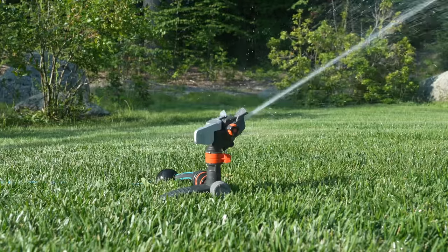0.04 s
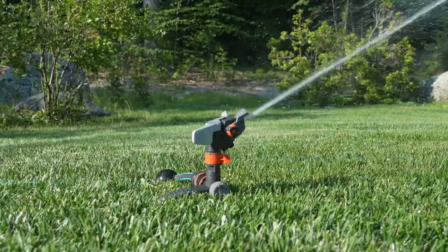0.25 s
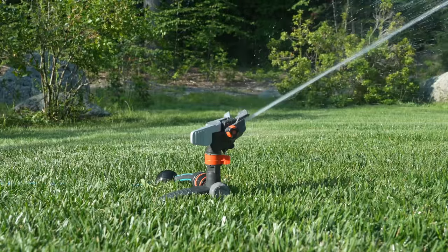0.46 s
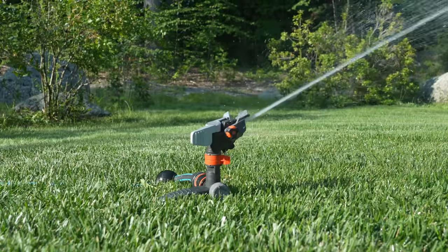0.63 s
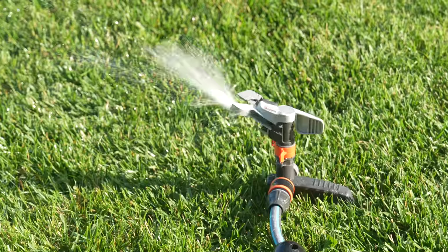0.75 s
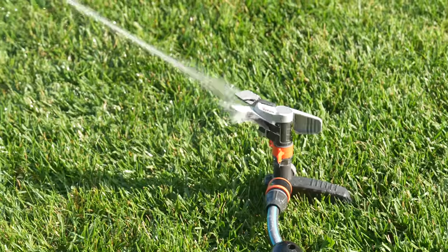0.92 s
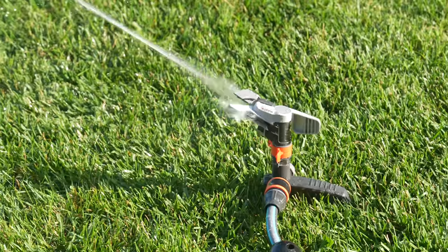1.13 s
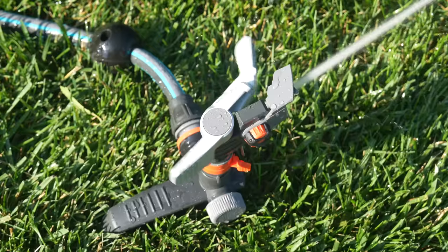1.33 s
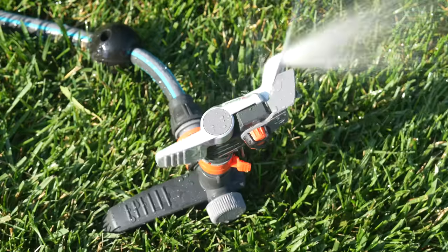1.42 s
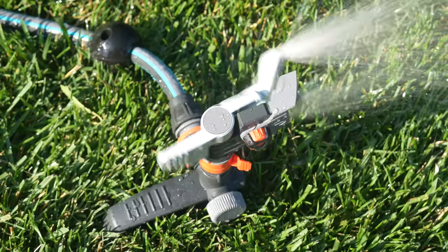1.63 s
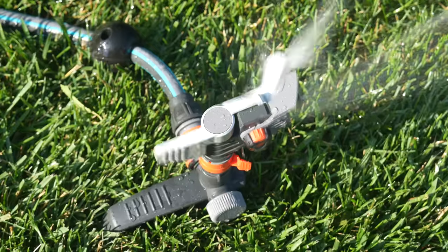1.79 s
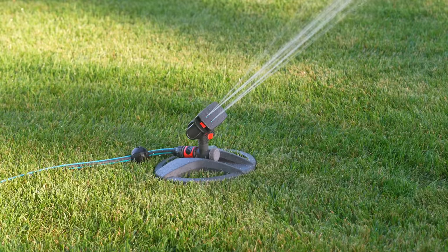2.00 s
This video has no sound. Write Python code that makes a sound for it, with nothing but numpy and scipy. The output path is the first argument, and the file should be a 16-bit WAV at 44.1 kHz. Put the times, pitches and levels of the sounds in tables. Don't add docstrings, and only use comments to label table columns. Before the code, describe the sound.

Outdoors on a lawn, a sprinkler arm chops its hissing water jet in crisp, even splashes with plastic knocks, softer at first and louder from a nearer spot, then only hiss, with low road rumble and faint bird chirps.

```python
import sys
import numpy as np
from scipy import signal
from scipy.fft import rfft, irfft, next_fast_len
from scipy.io import wavfile
from scipy.ndimage import uniform_filter1d, map_coordinates

SR = 44100
rng = np.random.default_rng(int(sys.argv[2]) if len(sys.argv) > 2 else 0)


def how_loud(loudness_db):
    steps = np.asarray(loudness_db, float) / 20
    return 10 ** steps


def output_pcm(signal):
    pcm = np.clip(np.atleast_2d(signal).T, -1, 1) * 32767
    wavfile.write(sys.argv[1], SR, np.round(pcm).astype(np.int16))


N = 90537
TOP_HZ = 15790

SPOT_EDGES_S = [0.0354, 0.703, 1.328, 1.997, 2.2]

# (frequency [Hz], density [dB per Hz])
JET_COLOUR = [
    [(820, -55), (1400, -10), (2370, -8.5), (2650, -5.5), (2930, -11), (5950, -4), (6450, -6),
     (9000, -12.5), (15700, -9.5)],
    [(820, -43), (1400, -6.5), (3890, -9), (4390, -4.5), (5540, -7.5), (6190, 0), (6710, -10.5),
     (12400, -9.5), (15700, -9.5)],
    [(820, -43), (1400, -10), (2320, -4.5), (3340, -4.5), (3620, -9.5), (5480, -3.5), (6250, -10),
     (12800, -7.5), (15700, -4.5)],
    [(820, -40), (1400, -7), (2140, 0), (2520, -5.5), (4810, 0.5), (12700, -7.5), (15700, -9.5)],
]
JET_DB = [-48, -51, -46.5, -41.5]
# (frequency [Hz], width [Hz], boost over hiss [dB])
NOZZLE_BANDS = [
    [(6430, 230, 7), (12600, 600, 1)],
    [(6000, 270, -2), (13000, 450, 6)],
    [(2280, 120, 2), (5270, 270, -1)],
    [(5000, 800, 0.5), (2270, 200, -2)],
]
JET_SWAY_DB = 0.7

# (frequency [Hz], density [dB per Hz])
TRAFFIC_COLOUR = [(12, -54), (28, -21.5), (113, 0), (151, -5), (206, -4), (295, -9.5), (566, -10.5),
                  (1160, -17), (1500, -23.5), (1950, -42.5), (3300, -120)]
TRAFFIC_DB = [-49.5, -48.5, -49.5, -44.5]
TRAFFIC_TILT_DB = [-3, 1, 0, 0.5]
# (frequency [Hz], width [Hz], boost [dB])
ENGINE_DRONES = [
    [(117, 28, -2.5), (270, 88, -4.5)],
    [(209.5, 5, 8.5), (246, 8.4, 8)],
    [(169, 12, 0.5), (201, 8.9, 0)],
    [(70.4, 12, 16.5), (199, 21, -2)],
]
HUM_DB = [-52.5, -55, -52.5, -58]
HUM_HZ, HUM_SWAY_DB = 115.5, 3.8

# (start [s], spot [index], splash [dB], stay in jet [s], main spoon ring [Hz])
ARM_SWINGS = [
    (0.143, 0, -29, 0.068, 4570),
    (0.337, 0, -29, 0.069, 4650),
    (.531, 0, -27.5, 0.066, 4630),
    (0.76, 1, -27.5, 0.064, 4470),
    (0.961, 1, -27, 0.062, 4310),
    (1.158, 1, -28, 0.064, 4410),
    (1.411, 2, -26, 0.057, 4050),
    (1.623, 2, -24, 0.056, 4570),
    (1.830, 2, -24.5, 0.056, 5120),
]
# (graze [dB], graze length [s], spoon ring fade [dB], spray swell [dB], leave [dB],
# leave length [s], tail [dB], extra at graze start [dB])
SWING_STAGES = [
    (-6.5, .013, -5, .5, -5, .011, -20, -5),
    (-8, .011, -9, -1.5, -4, .008, -19, -4),
    (-6, .011, -8, .8, -6, .007, -17, -4),
]
# (entry [dB], settling [s], middle [dB], exit surge [dB], surge length [s],
# mist [dB], mist t60 [s])
SPRAY_ARC = [
    (-6.5, .012, 1.5, 2, 0.029, -15, 0.12),
    (2.5, 0.012, -3, 2, 0.0085, -14.5, 0.17),
    (-2, 0.018, -1, 1.5, 0.0078, -12, 0.14),
]
# (frequency [Hz], density [dB per Hz])
SPRAY_COLOUR = [
    [(650, -68), (1100, -48), (2320, -3.5), (3500, -7.5), (4470, -11), (5900, -17.5), (7130, -4.5),
     (7970, -10), (15700, -4.5)],
    [(650, -59), (1100, -35), (1470, -11), (1900, -33), (2070, -11), (3580, -7), (4470, -3), (8520, -9.5),
     (15700, -3.5)],
    [(650, -34), (1100, -4.5), (1660, -12.5), (2220, 0), (2770, -20.5), (4180, 0), (5640, -5.5),
     (6740, -2.5), (15700, -2)],
]
# (frequency [Hz], width [Hz], level [dB])
SPOON_MODES = [
    [(4080, 93, 2.5), (4460, 59, 8), (5190, 140, 2), (6420, 180, -6.5), (6870, 280, -7), (7000, 140, -3.5),
     (9250, 760, -6.5), (12200, 480, -24)],
    [(4220, 160, 5), (4570, 400, -3), (5220, 180, 1.5), (5780, 160, 2), (6340, 200, 0), (9360, 370, -7),
     (10700, 520, -7)],
    [(4110, 50, -7), (4570, 89, -3), (5135, 170, 0), (6440, 270, -4.5), (6860, 34, 5.5), (7840, 90, -2),
     (11100, 180, -11)],
]
# (frequency [Hz], width [Hz], level [dB])
BODY_MODES = [
    [(1820, 220, -10.5), (2280, 160, -4.5), (2790, 250, -1)],
    [(1476, 125, -4.5), (2100, 190, -7), (2880, 570, -5)],
    [(1790, 760, -15.5), (2296, 145, -2.5), (3260, 240, 4)],
]
# (level at flooding [dB], level at exit [dB])
BODY_DB = [
    (-16.5, -9.5),
    (-20, -14),
    (-16.5, -10),
]
EDGE_S, TAIL_T60_S, LEAVE_FALL_DB = 0.0014, 0.057, 6
GRAZE_SPRAY_DB, GRAZE_SPOON_DB, GRAZE_BODY_DB = -4, 1, -16
SPOON_DB, FLUTTER_DB, FLUTTER_HZ = -3, 2.1, 200
GRAIN_DB, GRAINS_PER_S, GRAIN_SPREAD_DB = -6, 1600, 3.5
SING_WIDTH_HZ, SING_DB, SING_FADE_DB = 180, -8, -10

# (time [s], pitch [Hz], peak [dB])
AIR_POCKETS = [(0.1631, 4600, -28.5), (0.1761, 4700, -39), (0.181, 4730, -31.8), (0.2, 7250, -25.5),
               (0.206, 2906, -30.1), (0.3706, 4260, -28.5), (0.379, 4660, -33), (0.3856, 11700, -35),
               (0.3926, 4040, -30), (0.3936, 10000, -31), (0.5537, 11676, -28), (0.5645, 4640, -27),
               (0.577, 4500, -34), (0.5796, 6770, -32), (0.5892, 2330, -27), (0.7762, 6390, -28.5),
               (0.7787, 11125, -33.6), (0.7798, 4510, -33), (0.7882, 4310, -33), (0.7885, 5480, -30),
               (0.9752, 6200, -32), (0.9747, 4470, -30), (0.9896, 4670, -25.5), (1.0015, 4640, -26),
               (1.016, 11175, -33), (1.1763, 4610, -28), (1.176, 5650, -26), (1.1838, 4040, -27.5),
               (1.189, 5140, -28), (1.2144, 4170, -40), (1.4266, 5220, -25), (1.4327, 5110, -21),
               (1.4414, 4159, -19), (1.4587, 6970, -28), (1.4632, 3960, -28), (1.6343, 5010, -30),
               (1.6388, 6090, -23), (1.6463, 4350, -21.5), (1.6573, 6800, -25), (1.6656, 4140, -22.5),
               (1.8423, 6400, -34), (1.8428, 5130, -25), (1.8503, 5240, -33), (1.8583, 5230, -37),
               (1.8817, 5011, -27.0)]
POCKET_S, POCKET_DB, POCKET_GLIDE_HZ = 0.009, 1, 120

# (time [s], peak [dB])
ARM_STRIKES = [
    (0.162, -26.5),
    (0.3559, -22),
    (0.5482, -22),
    (0.778, -28),
    (0.9794, -24),
    (1.178, -25.5),
    (1.4261, -27),
    (1.6374, -26),
    (1.8472, -23.5),
]
# (frequency [Hz], level [dB], t60 [s])
FRAME_MODES = [
    [(2410, 3.5, 0.02), (2770, -4, 0.019), (4430, -15, 0.0047)],
    [(3066, 6, 0.013), (2120, -15.5, 0.04), (1420, -16, 0.034)],
    [(2300, 2, 0.015), (3370, -2, 0.013), (5060, -2, 0.01)],
]
REBOUND_DB = [-8, -6.5, -7]
REBOUND_S, KNOCK_DB = 0.037, 1.5

# (time [s], peak [dB])
SPOON_CRACKS = [(.1781, -18), (.1917, -19), (.2007, -15), (.2055, -18), (.3863, -16), (.5494, -20),
                (.5643, -17), (.9885, -16), (1.2193, -20), (1.4325, -14), (1.4592, -11), (1.4642, -15),
                (1.6725, -15), (1.8427, -16), (1.8592, -16), (1.8739, -16), (1.8779, -15), (1.8845, -17)]
# (time [s], peak [dB])
SHED_DROPS = [
    (.2285, -40),
    (.253, -42),
    (.4355, -44),
    (.8515, -40),
    (1.0417, -32),
    (1.4895, -38),
    (1.9195, -40),
]

# (start [s], length [s], from [Hz], to [Hz], level [dB])
BIRD_NOTES = [
    (1.246, .027, 2950, 2740, -55),
    (1.342, .012, 2330, 2300, -55),
    (1.764, .018, 3400, 3320, -55),
    (1.805, .012, 2270, 2270, -57),
    (1.912, .022, 3400, 3350, -53),
    (1.505, .008, 5200, 5200, -53),
    (.665, .035, 6350, 6450, -57),
]
BIRD_ROUGH_DB = 1.2


def unit(x):
    return x / np.sqrt(np.mean(x ** 2) + 1e-20)


def along(points, hz):
    f, v = np.transpose(points)
    return np.interp(np.log(hz + 1), np.log(f + 1), v)


def wobble(rate_hz):
    return map_coordinates(rng.standard_normal(N // 40), [np.arange(N) * rate_hz / SR])


def filtered(x, response):
    m = next_fast_len(N + 8192)
    return unit(irfft(rfft(x, m) * response(np.fft.rfftfreq(m, 1 / SR)), m)[:N])


def highpass(f, corner_hz):
    return f ** 4 / (f ** 4 + corner_hz ** 4)


def rings(f, peaks):
    total = 0
    for k, (c, w, db) in enumerate(peaks):
        total = total + (-1) ** k * how_loud(db) * 1j * f * w / (c * c - f * f + 1j * f * w)
    return total


def bands(f, rows):
    return sum(db * np.exp(-((f - c) / w) ** 2) for c, w, db in rows)


def patchy(depth_db):
    z = signal.stft(rng.standard_normal(N + 512), nperseg=256)[2]
    field = uniform_filter1d(rng.standard_normal(z.shape), size=4, axis=0)
    field = uniform_filter1d(field, size=5, axis=1)
    return signal.istft(z * how_loud(depth_db * unit(field)), nperseg=256)[1][:N]


def droplets(per_s, spread_db):
    chance, sign, size = rng.random((3, N))
    size_db = np.minimum(-spread_db * np.log(size + 1e-9), 10)
    return unit((chance < per_s / SR) * np.sign(sign - 0.5) * how_loud(size_db))


def spot(k):
    t = np.arange(N) / SR
    inside_s = np.minimum(t - SPOT_EDGES_S[k], SPOT_EDGES_S[k + 1] - t)
    return np.clip(inside_s / 0.00037 + 0.5, 0, 1)


def jet():
    out = np.zeros(N)
    for k in range(4):
        water = patchy(depth_db=1.5) + how_loud(-10) * droplets(1200, spread_db=2)
        hiss = filtered(water, lambda f: how_loud(along(JET_COLOUR[k], f) + bands(f, NOZZLE_BANDS[k])))
        out += spot(k) * how_loud(JET_DB[k] + JET_SWAY_DB * wobble(13.13)) * hiss
    return out


def traffic():
    out = np.zeros(N)
    for k in range(4):
        def colour(f):
            tilt_db = TRAFFIC_TILT_DB[k] * np.clip(np.log2((f + 1) / 200), 0, 2)
            return how_loud(along(TRAFFIC_COLOUR, f) + bands(f, ENGINE_DRONES[k]) + tilt_db)

        rumble = filtered(patchy(depth_db=-0.5), colour)
        hum = np.sin(2 * np.pi * np.cumsum(HUM_HZ + 8 * wobble(10)) / SR)
        hum *= how_loud(HUM_DB[k] + HUM_SWAY_DB * wobble(6.46))
        out += spot(k) * (how_loud(TRAFFIC_DB[k] + 0.41 * wobble(2.95)) * rumble + hum)
    return out


def spoon_water():
    flutter = how_loud(FLUTTER_DB * wobble(FLUTTER_HZ))
    return flutter * (patchy(depth_db=2.4) + how_loud(GRAIN_DB) * droplets(GRAINS_PER_S, GRAIN_SPREAD_DB))


def splash():
    out, t = np.zeros(N), np.arange(N) / SR
    for k, (graze, lead, fade, swell, leave, trail, tail, ramp) in enumerate(SWING_STAGES):
        def spray_colour(f):
            return how_loud(along(SPRAY_COLOUR[k], f) - 3.9 * (f < 3500)) * highpass(f, 1500)

        def body_colour(f):
            return rings(f, BODY_MODES[k]) * highpass(f, 1300) / (1 + (f / 4000) ** 4)

        spray = filtered(spoon_water(), spray_colour)
        spoon = filtered(spoon_water(), lambda f: rings(f, SPOON_MODES[k]) * highpass(f, 3300))
        body = filtered(spoon_water(), body_colour)
        entry_db, settle_s, middle_db, surge_db, surge_s, mist_db, mist_t60_s = SPRAY_ARC[k]
        for s, where, db, stay, ring_hz in ARM_SWINGS:
            if round(where) != k:
                continue
            at = s + np.cumsum([-EDGE_S, 2 * EDGE_S, lead - EDGE_S, EDGE_S, stay - lead - EDGE_S,
                                EDGE_S, trail, EDGE_S, TAIL_T60_S])

            def shape(flood_db, exit_db, graze_db):
                levels_db = [graze + ramp - 18, graze + graze_db + ramp, graze + graze_db,
                             flood_db, exit_db, leave + exit_db, leave + exit_db - LEAVE_FALL_DB,
                             tail + min(exit_db, 0), tail - 60]
                return how_loud(db + np.interp(t, at, levels_db)) * (t > at[0])

            surge_at = at[4] - surge_s
            arc_db = np.interp(t, [at[2], at[3], at[3] + settle_s, surge_at - 0.006, surge_at, at[4], at[5]],
                               [0, entry_db, middle_db, middle_db, surge_db, surge_db, 0])
            mist = how_loud(db + mist_db - 60 * (t - at[5]).clip(0) / mist_t60_s) * (t > at[5])
            out += (how_loud(arc_db) * shape(0, swell, GRAZE_SPRAY_DB) + mist) * spray
            out += how_loud(SPOON_DB) * shape(0, fade, GRAZE_SPOON_DB) * spoon
            out += shape(*BODY_DB[k], GRAZE_BODY_DB) * body
            singing = filtered(rng.standard_normal(N),
                               lambda f: rings(f, [(ring_hz, SING_WIDTH_HZ, 0)]) ** 2)
            out += how_loud(SING_DB) * shape(0, SING_FADE_DB, GRAZE_SPRAY_DB) * singing
    return out


def gulps():
    out, length = np.zeros(N + SR), round(POCKET_S * SR)
    u = np.arange(length) / length
    for s, hz, db in AIR_POCKETS:
        glide, turn = rng.normal(size=2)
        cycles = np.cumsum(hz + POCKET_GLIDE_HZ * glide * (2 * u - 1)) / SR + turn
        ring = np.sin(np.pi * u) ** 2 * np.sin(2 * np.pi * cycles)
        out[round((s - POCKET_S / 2) * SR):][:length] += how_loud(db + POCKET_DB) * ring
    return out[:N] * how_loud(2.2 * wobble(450))


def knocks():
    out, t = np.zeros(N + SR), np.arange(SR // 10) / SR
    for s, db in ARM_STRIKES:
        where = np.searchsorted(SPOT_EDGES_S, s) - 1
        for delay_s, loss_db in ((0, 0), (REBOUND_S, REBOUND_DB[where])):
            ring = np.zeros(len(t))
            for hz, mode_db, t60_s in FRAME_MODES[where]:
                chance_db = rng.normal(0, 1.23)
                ring += how_loud(mode_db + chance_db - 60 * t / t60_s) * np.sin(2 * np.pi * hz * t)
            onset = 1 - np.exp(-t / 0.00068)
            out[round((s + delay_s) * SR):][:len(t)] += how_loud(db + loss_db + KNOCK_DB) * ring * onset
    return out[:N]


def spits():
    out, t = np.zeros(N + SR), np.arange(SR // 10) / SR
    for s, db in SPOON_CRACKS:
        ping = np.sin(2 * np.pi * rng.uniform(7000, 11000) * t)
        out[round(s * SR):][:len(t)] += how_loud(db - 60 * t / 0.0012) * ping
    return out[:N]


def drops():
    out, t = np.zeros(N + SR), np.arange(SR // 10) / SR
    for s, db in SHED_DROPS:
        tick = np.diff(rng.standard_normal(len(t) + 1))
        out[round(s * SR):][:len(t)] += how_loud(db - 60 * t / 0.003) * tick
    return out[:N]


def bird():
    out, t = np.zeros(N), np.arange(N) / SR
    for s, length_s, from_hz, to_hz, db in BIRD_NOTES:
        u = np.clip((t - s) / length_s, 0, 1)
        swell = np.sqrt(np.sqrt(2) * np.sin(np.pi * u).clip(0))
        whistle = np.sin(2 * np.pi * np.cumsum(from_hz + (to_hz - from_hz) * u) / SR)
        out += how_loud(db + BIRD_ROUGH_DB * wobble(160)) * swell * whistle
    return out


def scene():
    arm = splash() + gulps() + knocks() + drops() + spits()
    return (arm + jet() + traffic() + bird())[None]


def roll_off(x):
    return signal.sosfilt(signal.butter(12, 16570, fs=SR, output="sos"), x)


def record(dry):
    m = next_fast_len(N + 8192)
    edge = np.clip((TOP_HZ - np.fft.rfftfreq(m, 1 / SR)) / 250 + 0.5, 0, 1) ** 2
    mix = irfft(rfft(dry, m) * edge, m)[:, :N]
    return roll_off(mix)


dry = scene()
out = record(dry)
output_pcm(out)
```